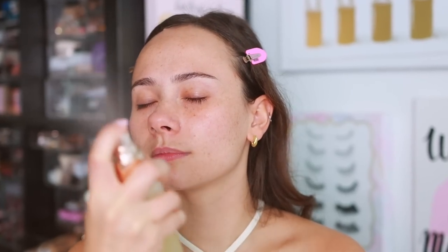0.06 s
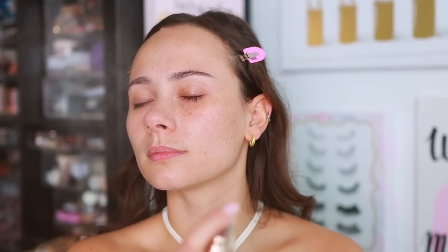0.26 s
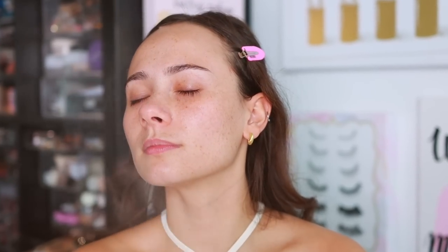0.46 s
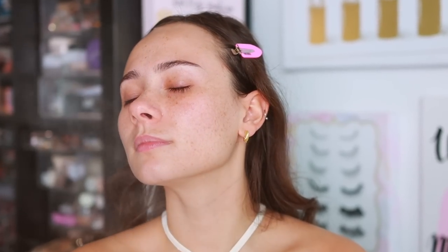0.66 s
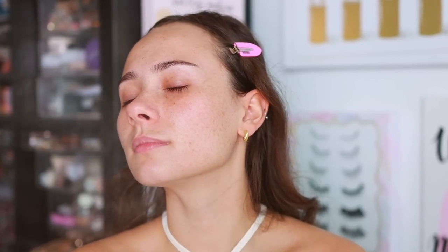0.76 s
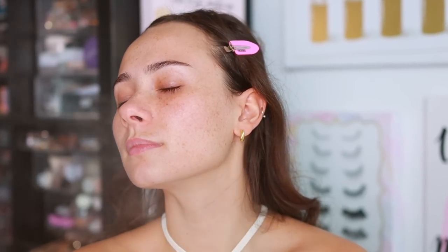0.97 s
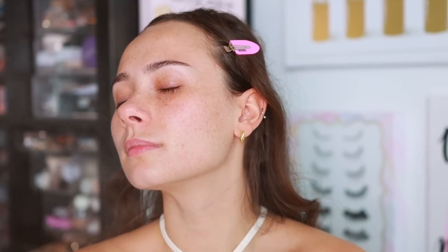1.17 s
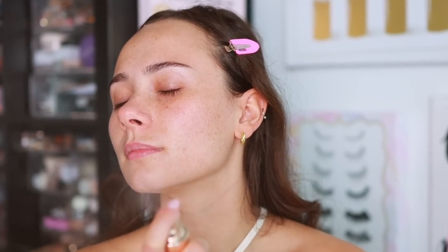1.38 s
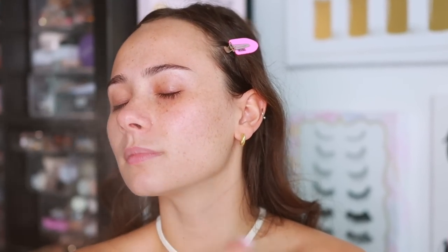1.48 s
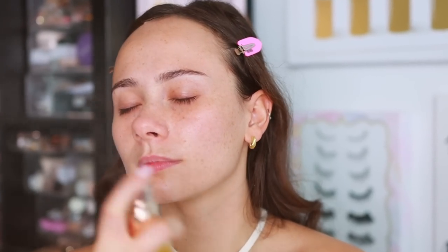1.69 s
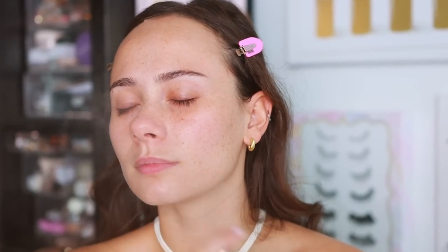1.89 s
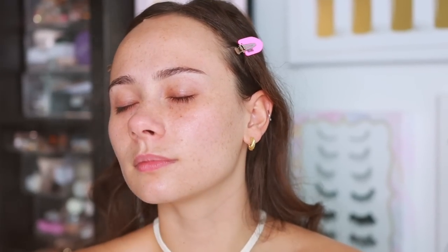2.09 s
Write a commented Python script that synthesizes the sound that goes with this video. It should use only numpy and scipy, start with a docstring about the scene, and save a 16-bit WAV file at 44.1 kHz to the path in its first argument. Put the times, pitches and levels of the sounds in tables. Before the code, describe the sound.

A finger-pump bottle sprays fine mist in five short, bright hisses indoors.

```python
"""A short, bright puff of hiss, then four more: a finger-pump bottle sprays mist in a small room.
In each stroke the valve blips open and a turbulent jet hisses at the nozzle while the pressure
crests and sags. Most strokes end with the plunger knocking on its stop, which rings the bottle;
some add a thin tick on release. A low, uneven room rumble fills the gaps."""
import sys
import numpy as np
from scipy import signal
from scipy.fft import rfft, irfft
from scipy.io import wavfile
from scipy.ndimage import map_coordinates

SR = 44100
rng = np.random.default_rng(int(sys.argv[2]) if len(sys.argv) > 2 else 0)


def master(y):
    """Save y as 16-bit WAV."""
    cut = np.clip(np.atleast_2d(y).T, -1, 1)
    pcm = np.round(cut * 32767)  # scale
    wavfile.write(sys.argv[1], SR, pcm.astype(np.int16))


N = 94550

# Pump strokes: full_flow_s, shut_off_s, crest_db, sag_db, closing_s, tilt_db_per_octave,
# orifice_hz, orifice_re_jet_db, leak_re_flow_db
STROKES = [(0.095, 0.204, -34.5, 4.5, 0.0014, -0.66, 8100, -7.5, -2),
           (0.498, 0.628, -31, 7.5, .002, -0.5, 8020, -3, -8.5),
           (.939, 1.092, -31.5, 7.5, 0.0024, 0.2, 7980, -5, -8.5),
           (1.439, 1.571, -33, 6.5, 0.001, -.5, 7900, -5.5, -7.5),
           (1.864, 2.004, -35, 6, 0.0068, 0, 8010, -5, -1.5)]
# Jet turbulence: frequency_hz, relative_db
JET_SPECTRUM = [(60, -61.5), (300, -54), (800, -28), (1200, -30.5), (1450, -17), (1750, -9), (2300, -7.5),
                (3300, -4), (4800, -3), (6100, -1.5), (7000, -4.5), (8500, 0), (9400, -6.5), (10300, -14.5),
                (11500, -6), (13000, -3), (14500, -9), (16000, -17.5)]
# Single coarse droplets: start_s, gain_db
DROPLETS = [(.509, -25.5), (.529, -25), (0.553, -37.5), (0.5517, -29.5), (1.504, -54)]
# Plunger impacts: start_s, blow_db, blow_hz, blow_t60_s, ring_db, grip_pitch_ratio, crack_db, low_cut_hz
IMPACTS = [(.2112, -23, 893, 0.0088, -36, 0.97, -35, 622), (0.6278, -18, 1037, 0.013, -30, 1.01, -27, 380),
           (1.1171, -16.5, 1040, .0035, -36, 0.998, -61, 259),
           (2.0296, -27.5, 825, 0.0082, -38.5, 1.07, -25.5, 268)]
# Bottle modes: pitch_hz, relative_db, t60_s
BOTTLE_MODES = [(370, -7, .035), (570, -5, .03), (880, 0, .028), (1130, -5, .025), (1400, -3, .025),
                (1700, -9, .02), (2100, -11, .015)]
# Contact crack: frequency_hz, relative_db
CRACK_SPECTRUM = [(300, -5.5), (1000, -3), (2000, 10.5), (2550, 5.5), (3100, 3.5), (4200, -2.5), (5500, -3),
                  (8000, -5), (9600, 0.5), (11000, -3.5), (16000, -38)]
# Plunger releases: start_s, gain_db, tilt_db_per_octave
RELEASES = [(0.2602, -28, -8), (0.6696, -32.5, 0), (1.6248, -35, -1), (1.6252, -41.5, 3)]
# Release tick: frequency_hz, relative_db
TICK_SPECTRUM = [(1000, -47.5), (2500, -20.5), (3500, -29.5), (6500, -12.5), (8200, 0), (10000, -7),
                 (11500, -0.5), (13500, 7.5), (14700, -34), (16000, -25.5)]
# Liquid in the valve: centre_s, level_db, pitch_hz
VALVE_BLIPS = [(0.07, -57, 2210), (0.47, -60, 2090), (0.625, -29, 1823), (0.9137, -46, 1920),
               (1.415, -55, 1850), (1.642, -61, 2000), (1.839, -49, 1870), (2.031, -35.5, 1890),
               (2.0825, -42.5, 2150)]
# Skin on the bottle: centre_s, half_length_s, level_db, pitch_hz
HAND_RUBS = [(0.018, 0.019, -75.5, 4100), (2.117, 0.0018, -75, 3900)]
# Reverberation time: frequency_hz, t60_s
ROOM_DECAY = [(150, .3), (500, .28), (1000, .26), (2500, .28), (5000, .24), (9000, .2), (15000, .13)]
# Colour of the reflections: frequency_hz, gain_db
ROOM_RESPONSE = [(150, 17.5), (1000, -1), (3000, -2), (6000, 2.5), (9000, 0.5), (12000, -3), (16000, -0.5)]
# Room rumble: frequency_hz, relative_db
RUMBLE_SPECTRUM = [(20, -30.5), (50, -33.5), (80, -15), (100, -15), (125, -10), (180, 0.5), (250, -1),
                   (310, 4), (420, 6.5), (570, 1.5), (700, -7.5), (950, -16.5), (1600, -37.5), (3000, -43),
                   (8000, -39.5), (14000, -80.5), (16000, -52.5)]
# Rumble envelope: time_s, relative_db
RUMBLE_CONTOUR = [(0.0, -55), (0.11, -59.5), (0.57, -58), (1.19, -66), (1.56, -62.5), (1.7, -66.5),
                  (2.03, -70.5), (2.14, -72)]
# Brief swells of the rumble: centre_s, half_length_s, level_db
RUMBLE_SWELLS = [(0.067, 0.028, -51.5), (0.333, .025, -57.5), (0.428, 0.017, -55), (0.804, 0.04, -59),
                 (1.385, 0.051, -64), (1.662, 0.019, -54.5), (1.929, 0.027, -54.5)]
# Hum lines: pitch_hz, level_db
HUM_LINES = [(170, -78), (208, -74.5), (416, -77), (459, -77.5), (566, -77)]
# Faint room hiss: frequency_hz, relative_db
AIR_SPECTRUM = [(20, 4.5), (200, 13.5), (2000, 1), (6000, -7), (10000, -8.5), (14000, -9), (15000, -14),
                (16000, -26.5)]


def mist():
    """Turbulent jet noise follows the nozzle pressure; an orifice resonance climbs through each stroke."""
    rise_s, rise_db, crest, swell_db = 0.031, 35, 0.54, 2  # crest is a fraction of the stroke
    spits_per_s, orifice_glide, orifice_width_hz = 390, 0.14, 1900
    open_lead_s, open_edge_s, leak_s = 0.024, 0.0012, 0.025
    t, out = np.arange(N) / SR, np.zeros(N)
    for start, end, crest_db, sag_db, closing_s, tilt_db, orifice_hz, orifice_db, leak_db in STROKES:
        progress = np.clip((t - start) / (end - start), 0, 1)
        level_db = crest_db - rise_db * np.clip((start - t) / rise_s, 0, 4) ** 1.03
        level_db -= swell_db * np.maximum(1 - progress / crest, 0)
        level_db -= sag_db * np.maximum((progress - crest) / (1 - crest), 0) ** 0.51
        spit_times = rng.random(N) < spits_per_s / SR  # larger droplets leave at random
        spits = spit_times * amp(0.5 + 3 * np.minimum(rng.exponential(1, N), 5))
        jet = unit(colour(rng.standard_normal(N) + spits, JET_SPECTRUM, tilt_db))
        pitch_hz = orifice_hz * (1 + orifice_glide * progress)
        whistle = unit(resonate(high_pass(rng.standard_normal(N), 2000), pitch_hz, orifice_width_hz))
        opened = 0.5 + 0.5 * np.tanh((t - start + open_lead_s) / open_edge_s)
        closed = 0.5 + 0.5 * np.tanh((t - end) / (2 * closing_s))
        leak = closed * amp(leak_db) * np.exp(-np.maximum(t - end, 0) / leak_s)  # residual pressure
        out += unit(jet + amp(orifice_db) * whistle) * amp(level_db) * opened * (1 - closed + leak)
    flutter_db = 0.5 * wander(hz=193.5)
    surge_db = wander(hz=25)
    return out * amp(surge_db - flutter_db)


def droplets():
    """Each coarse droplet is an impulsive source with the spectrum of the jet."""
    out = np.zeros(N)
    for start, db in DROPLETS:
        add(out, start, amp(db) * snap(JET_SPECTRUM, decay_s=0.00043))
    return out


def plunger_knocks():
    """Impact on the stop excites the bottle's damped modes, whose pitch shifts with the grip."""
    t, out = np.arange(SR // 10) / SR, np.zeros(N)
    attack = 1 - np.exp(-t / 0.0002)
    for start, blow_db, blow_hz, blow_t60, ring_db, grip, crack_db, low_cut_hz in IMPACTS:
        ring = sum(damped_mode(t, hz * grip, db, t60) for hz, db, t60 in BOTTLE_MODES)
        blow = damped_mode(t, blow_hz, blow_db, blow_t60)
        knock = high_pass((blow + amp(ring_db) * ring) * attack, low_cut_hz)
        add(out, start, low_pass(knock, 2.36 * blow_hz))  # the soft stop damps the treble
        crack = high_pass(snap(CRACK_SPECTRUM, decay_s=0.0015), low_cut_hz)
        add(out, start, amp(crack_db) * crack)
    return out


def release_ticks(low_cut_hz=4000, sizzle_db=-15.5, sizzle_s=0.0042):
    """Release is a brief transient, after which the spring's vibration dies away as a sizzle."""
    t, out = np.arange(SR // 10) / SR, np.zeros(N)
    for start, db, tilt_db in RELEASES:
        tick = snap(TICK_SPECTRUM, decay_s=0.00058, tilt_db=tilt_db)
        spring = unit(colour(rng.standard_normal(len(t)), TICK_SPECTRUM, tilt_db))
        sizzle = amp(sizzle_db) * spring * np.exp(-t / sizzle_s)
        for sound in (tick, sizzle):
            add(out, start, amp(db) * high_pass(sound, low_cut_hz))
    return out


def valve(half_s=0.0016):
    """Liquid starting or stopping radiates a wave packet a few cycles long."""
    t = np.arange(N) / SR
    return sum(amp(db) * gaussian(t - centre, half_s) * np.sin(2 * np.pi * hz * (t - centre))
               for centre, db, hz in VALVE_BLIPS)


def hand_rubs():
    """Friction of skin on the bottle makes faint narrow-band noise."""
    t, out = np.arange(N) / SR, np.zeros(N)
    for centre, half_s, db, hz in HAND_RUBS:
        friction = resonate(rng.standard_normal(N), np.full(N, hz), width_hz=760)
        out += amp(db) * unit(friction) * gaussian(t - centre, half_s)
    return out


def face_reflection(x, echo_db=-15.5):
    """Comb filtering: an echo off the face interferes, its delay drifting as the hand moves."""
    delay_s = 0.0015 + 0.0005 * np.tanh(wander(hz=1))
    echo = map_coordinates(x, [np.arange(N) - delay_s * SR], order=3)
    return (x + amp(echo_db) * echo) / np.hypot(1, amp(echo_db))


def room(x, reflections=8, gap_s=0.003, build_s=0.014):
    """Reverberation: sparse early reflections and a diffuse tail that decays fastest in the treble."""
    hz, t, bands = signal.stft(rng.standard_normal(SR // 2), SR, nperseg=256)
    decay = amp(-60 * t / read(ROOM_DECAY, hz)[:, None])
    tail = signal.istft(bands * decay, SR, nperseg=256)[1]
    tail *= np.clip((np.arange(len(tail)) / SR - gap_s) / build_s, 0, 1)
    response = amp(-15) * tail / np.linalg.norm(tail)
    early_gain = amp(-27) / np.sqrt(reflections)
    for when, polarity in rng.random((reflections, 2)):
        add(response, gap_s + 0.023 * when, [np.sign(polarity - 0.5) * early_gain])
    return colour(signal.fftconvolve(x, response)[:N], ROOM_RESPONSE)


def background(hum_waver=0.51, air_db=-77):
    """Ambient noise is a superposition of uneven rumble, modulated hum lines and thin hiss."""
    t = np.arange(N) / SR
    contour = amp(np.interp(t, *np.transpose(RUMBLE_CONTOUR)) + 1.5)
    rumble = contour * unit(colour(rng.standard_normal(N), RUMBLE_SPECTRUM))
    swells = sum(amp(db) * gaussian(t - centre, half_s) for centre, half_s, db in RUMBLE_SWELLS)
    rumble += swells * unit(low_pass(high_pass(rng.standard_normal(N), 410), 438, order=5))
    hum = np.zeros(N)
    for hz, db in HUM_LINES:
        tone = np.sin(2 * np.pi * hz * t + 2 * hum_waver * wander(hz=4))
        hum += amp(db) * unit(tone * (1 + hum_waver * wander(hz=3.3)))
    return rumble + hum + amp(air_db) * unit(colour(rng.standard_normal(N), AIR_SPECTRUM))


def amp(db):
    """Amplitude grows tenfold every 20 dB."""
    return 10 ** (np.asarray(db) / 20)


def unit(x):
    """Normalisation to an rms of 1."""
    return x / np.sqrt(np.mean(x ** 2) + 1e-20)


def read(points, hz):
    """Interpolation on a log-frequency axis."""
    f, value = np.transpose(points)
    return np.interp(np.log(hz + 1), np.log(f + 1), value)


def add(mix, start_s, sound):
    """Superposition of a sound on the mix, in place."""
    part = mix[max(round(start_s * SR), 0):][:len(sound)]
    part += sound[:len(part)]


def gaussian(t, half_s):
    """A Gaussian envelope, down to 1/e at half_s either side of zero."""
    return np.exp(-(t / half_s) ** 2)


def damped_mode(t, hz, db, t60):
    """Free vibration that loses 60 dB in t60 seconds."""
    return amp(db - 60 * t / t60) * np.sin(2 * np.pi * hz * t)


def colour(x, spectrum, tilt_db=0):
    """Spectral shaping, with a tilt per octave above 1500 Hz that pivots at 6000 Hz."""
    hz = np.fft.rfftfreq(len(x), 1 / SR)
    octaves = np.log2(np.maximum(hz, 1500) / 6000)
    return irfft(rfft(x) * amp(read(spectrum, hz) + tilt_db * octaves), len(x))


def wander(hz):
    """Random modulation, band-limited to about hz."""
    f = np.fft.rfftfreq(N, 1 / SR)
    return unit(irfft(rfft(rng.standard_normal(N)) / (1 + (f / hz) ** 4), N))


def resonate(x, hz, width_hz):
    """Two resonators in cascade, each width_hz wide, follow the curve hz."""
    phasor = np.exp(2j * np.pi * np.cumsum(hz) / SR)
    pole = np.exp(-np.pi * width_hz / SR)
    for _ in range(2):
        x = 2 * (phasor * signal.lfilter([1 - pole], [1, -pole], x / phasor)).real
    return x


def snap(spectrum, decay_s, tilt_db=0, size=1024):
    """A transient of coloured noise with exponential decay."""
    t = np.arange(size) / SR
    burst = np.pad(rng.standard_normal(size) * np.exp(-t / decay_s), (0, size))
    lead = size // 32  # space for the filter to ring ahead of the onset
    burst = colour(np.roll(burst, lead), spectrum, tilt_db)[lead // 2:size]
    return burst / np.linalg.norm(burst) * np.sqrt(decay_s * SR / 2)


def high_pass(x, hz, order=3):
    """Bass roll-off, as from a small radiator."""
    return signal.sosfilt(signal.butter(order, hz, "high", fs=SR, output="sos"), x)


def low_pass(x, hz, order=3):
    """Treble roll-off, as from a soft contact."""
    return signal.sosfilt(signal.butter(order, hz, fs=SR, output="sos"), x)


def scene():
    """Direct sound, reverberation and ambient noise add; a weak side signal leaves it almost mono."""
    spray = face_reflection(mist() + droplets())
    pump = plunger_knocks() + release_ticks() + valve() + hand_rubs()
    mid = spray + pump + room(spray + amp(-0.5) * pump) + background()
    side = amp(-45.5) * (room(spray + pump) + background())
    return np.array([mid + side, mid - side])


def record(dry):
    """Band limiting: a linear-phase low-pass removes the highest treble."""
    kernel = signal.firwin(511, 16150, window=("kaiser", 9), fs=SR)
    return signal.oaconvolve(dry, kernel[None], "same")


dry = scene()
out = record(dry)
master(out)
```